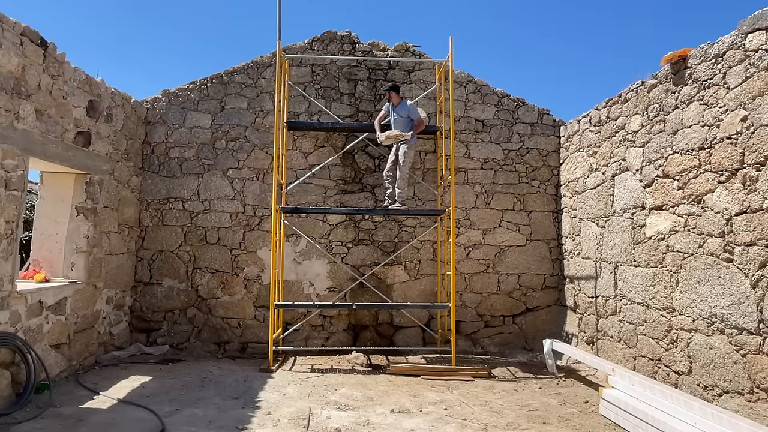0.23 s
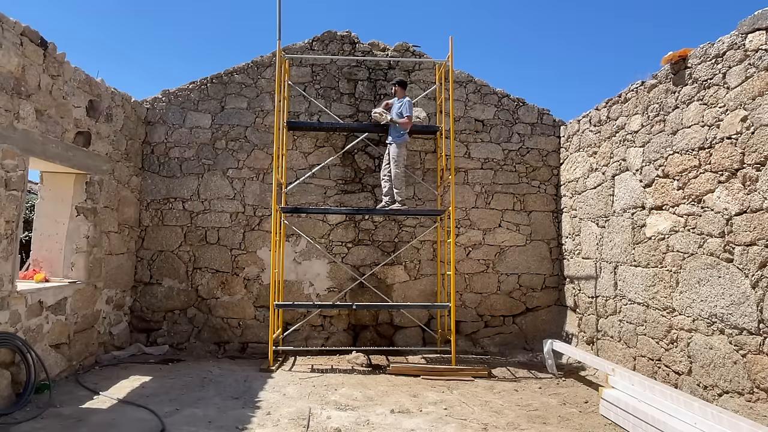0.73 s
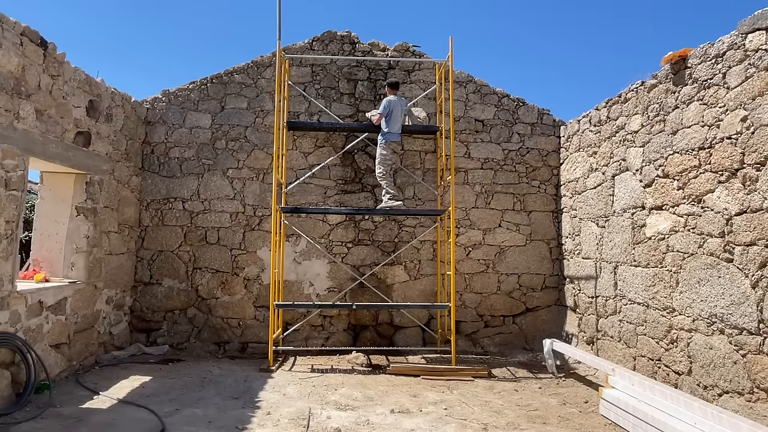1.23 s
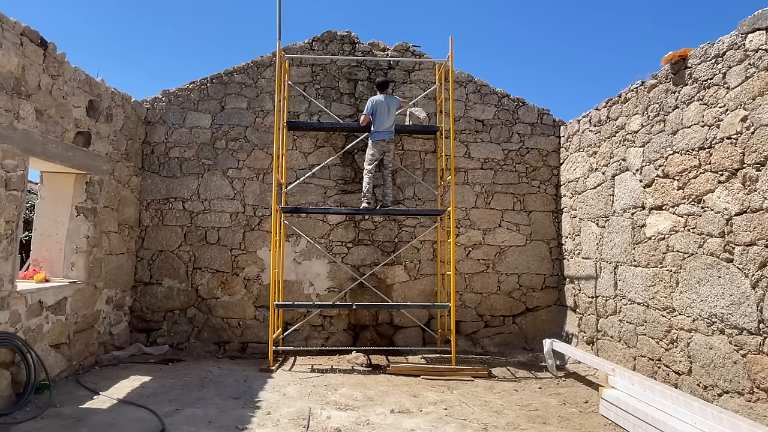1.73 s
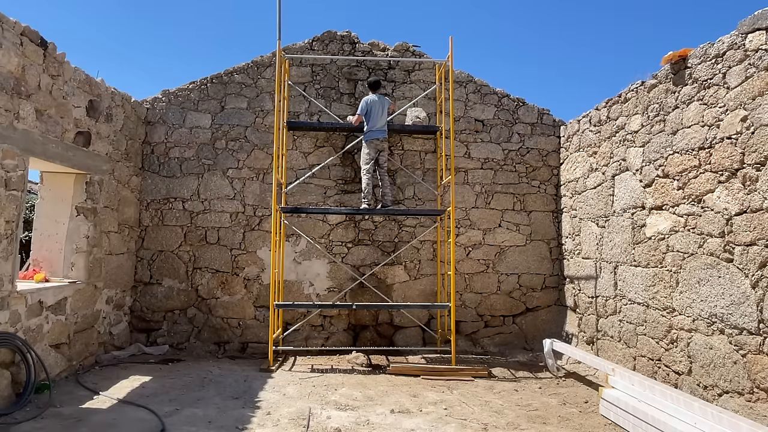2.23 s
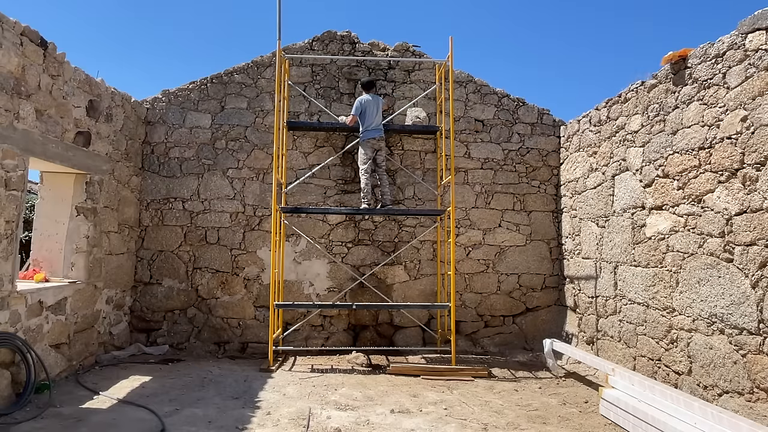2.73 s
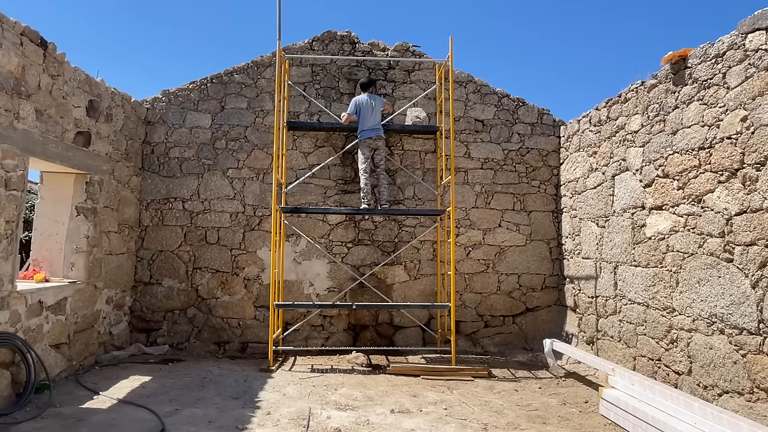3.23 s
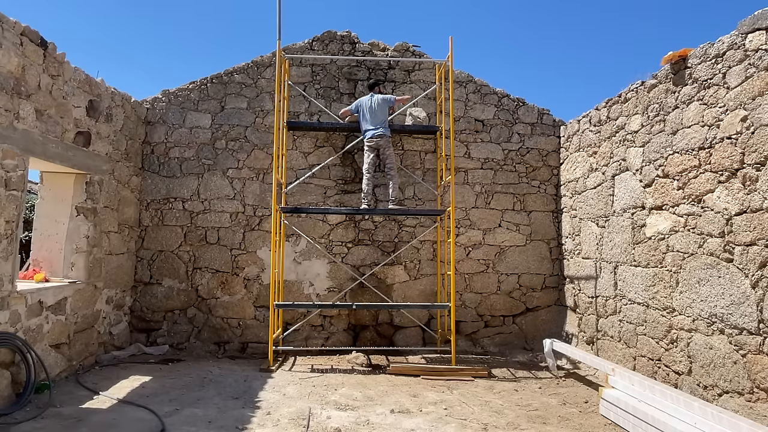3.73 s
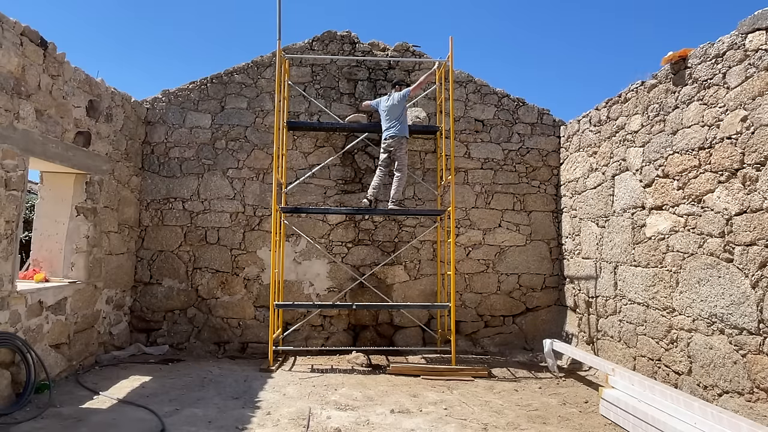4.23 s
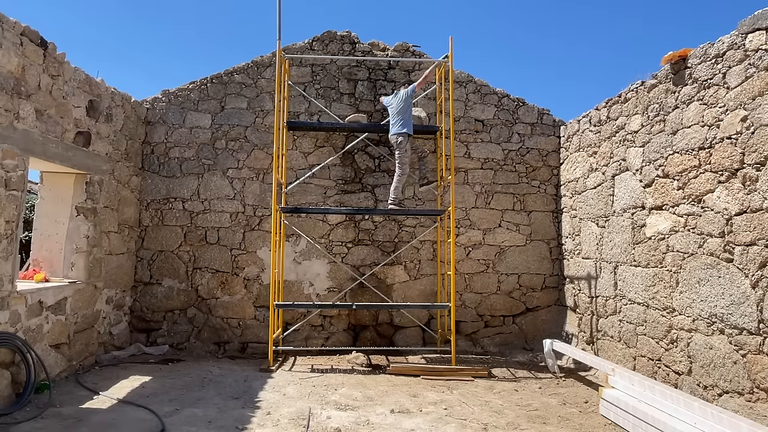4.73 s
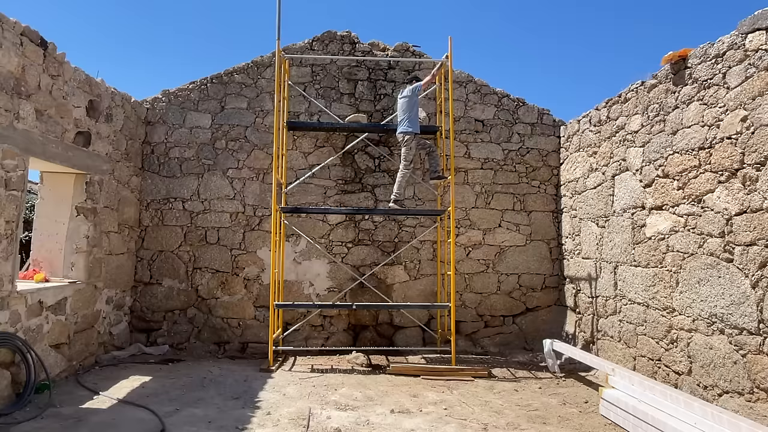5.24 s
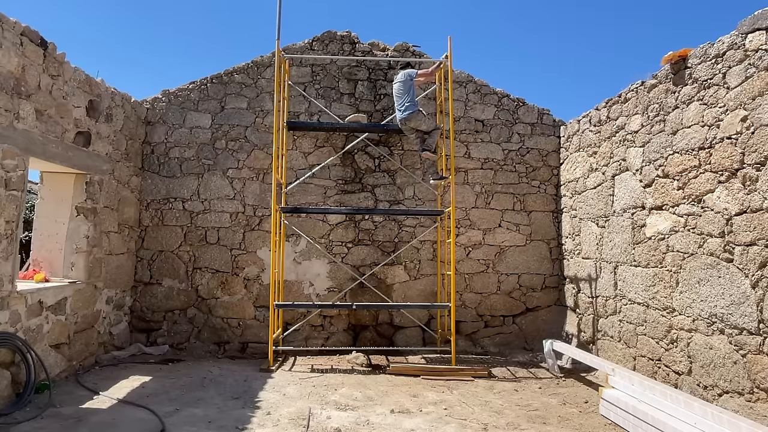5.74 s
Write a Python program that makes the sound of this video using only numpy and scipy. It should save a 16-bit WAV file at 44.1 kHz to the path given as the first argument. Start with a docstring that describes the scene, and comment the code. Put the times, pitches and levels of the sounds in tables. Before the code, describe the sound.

In a roofless stone shell, faint scuffs lead to a burst of heavy stone-on-board knocks and gritty dragging, then sparse footsteps and scrapes.

```python
"""Soft scrapes and scattered knocks come first, then heavy clacks and a gritty drag, with low gusts and faint hiss.
A heavy stone is carried along a scaffold inside a roofless stone house, set down on the upper deck and dragged.
Knocks are bursts of random grit clicks that ring the struck piece, the deck boards and the steel frame.
Stone and soles slide as filtered grain noise; fading noise gives the bare walls' echo.
Wind is a wobbling low tone with slow noise at two microphone ports; open air is shaped noise.
"""
import sys
import numpy as np
from scipy import signal
from scipy.fft import rfft, irfft
from scipy.io import wavfile
from scipy.ndimage import uniform_filter1d

SR = 44100
rng = np.random.default_rng(int(sys.argv[2]) if len(sys.argv) > 2 else 0)


def to_wav(sig):
    """Store sig (one row per channel, or 1-D mono) as 16-bit WAV at the path in sys.argv[1].

    Samples outside -1..1 are clipped; the rate is SR.
    """
    pcm = np.clip(np.atleast_2d(sig), -1, 1) * 32767
    pcm = np.round(pcm).astype(np.int16)
    wavfile.write(sys.argv[1], SR, pcm.T)  # frames by channels


N = 264600

# All table levels are settings that go in before the later gains, filters and echo.
# Blows: time_s (late in the build-up), strength_db, pitch_hz, deck_db, frame_db, grit_db
# (these three relative to the strength), contact_s (time constant of the fade)
BLOWS = [(0.391, -36.5, 2230, -23, -2, -16, 0.0054), (0.41, -50.5, 2140, -30, 12, 4, 0.003),
         (.428, -50, 2490, -28, 0, -16, 0.012), (0.52, -52.5, 1230, -10.5, -15, 2, 0.024),
         (0.551, -58, 6160, -2.5, 15.5, 1, 0.028), (0.854, -45.5, 846, -13, -18, -13, 0.023),
         (1.14, -54, 2210, -8, 11, -3, 0.013), (1.661, -44.5, 613, -15, 11.5, 0, 0.057),
         (1.694, -41, 2130, -9, 17, 5, 0.0093), (1.87, -57, 1480, -16.5, 3.5, -31, 0.029),
         (1.939, -49, 1760, -5, 12, -12.5, 0.018), (2.148, -23.5, 1100, -8, 3.5, -16.5, 0.013),
         (2.206, -20.5, 1370, -10.5, 5.5, -5, 0.0075), (2.223, -17, 864, -11.5, 4, -41, 0.005),
         (2.262, -26, 740, -17, -16, -40, 0.026), (2.392, -32, 1380, 2, -29, -2, 0.011),
         (2.424, -26, 980, -8, -25, -17, 0.0037), (2.497, -30, 1140, 0.5, -17, -28, 0.007),
         (2.558, -19.5, 1140, 1.5, -7.5, 2.5, 0.0088), (2.604, -24.5, 1140, 0, -8, 3.5, 0.0088),
         (2.629, -24.5, 1162, 1.5, -14, -4, 0.0063), (2.65, -17.5, 340, -24, -24, -20, 0.013),
         (2.68, -28.5, 730, -13, -20, -13, 0.013), (2.706, -25.5, 1090, -17.5, -13, -8, 0.0036),
         (2.815, -39.5, 2260, -9, 11, -17, 0.0099), (2.896, -34, 2044, -5.5, -5, 3.5, 0.018),
         (3.594, -45, 1300, -12, 7, -27, 0.029), (3.596, -49.5, 7270, -34, -4, -13, 0.024),
         (3.893, -60.5, 2036, -5.5, 8, -14, 0.02), (3.905, -44, 328, -33.5, -24, -19, 0.018),
         (3.979, -52.5, 5670, -27, -2, -1, 0.00082), (4.004, -54, 2200, -33, 5, 0.5, 0.014),
         (4.198, -33, 1470, -28.5, 5.5, -17.5, 0.024), (4.951, -43, 3040, -22, -5, -8, 0.00093),
         (4.958, -44, 2360, -7, 7, -6.5, 0.015), (5.109, -39, 630, -10, -20, -42, 0.0031),
         (5.194, -38.5, 1080, -4, -24, -42, 0.017), (5.232, -52.5, 1122, 8, -21, -34, 0.03),
         (5.443, -38.5, 2040, -4.5, 6, -8, 0.024), (5.447, -31.5, 458, -6.5, -8, -18.5, 0.025),
         (5.722, -37.5, 923, -4.5, -8, -33, 0.0029), (5.874, -25.5, 302, -11.5, -35, -38, 0.0061)]
# Slides over grit: start_s, length_s, grit_db, grit_pitch_hz, deck_rumble_db, sand_db, swell_db (over the slide)
SLIDES = [(0, 0.064, -68.5, 2240, -71, -86, -4), (0.09, 0.12, -69, 3900, -87, -74.5, 9),
          (0.229, 0.11, -71.5, 2640, -76.5, -73.5, 6), (0.794, 0.02, -73.5, 2600, -93, -73, -7),
          (0.847, 0.13, -71, 2530, -80.5, -76, 4.5), (1.11, 0.11, -62.5, 3060, -68.5, -70, 6),
          (1.282, 0.094, -71.5, 2400, -71, -77, -10), (1.52, 0.087, -72.5, 2390, -91, -86, -8.5),
          (1.704, 0.033, -67, 2380, -50, -48.5, -4.5), (2.187, 0.12, -64, 1351, -31, -51.5, -11.5),
          (2.416, 0.21, -57, 1950, -38, -59.5, 1), (2.619, 0.12, -69, 1700, -39.5, -55, -1),
          (2.835, 0.17, -44.5, 2300, -44, -49.5, -1), (3.12, 0.02, -64, 2380, -49, -54.5, -14),
          (3.163, 0.065, -56.5, 2300, -57, -65.5, 1), (4.084, 0.079, -67, 2400, -68.5, -73.5, 7),
          (4.528, 0.0177, -73, 2570, -75, -84.5, -7.5), (4.641, 0.056, -65.5, 3040, -62.5, -71, -1),
          (4.78, 0.078, -64.5, 3864, -73, -69.5, -1), (4.984, 0.059, -61.5, 2870, -56.5, -59.5, 0),
          (5.297, 0.17, -54.5, 3900, -55.5, -60, -1), (5.483, 0.18, -79, 3500, -46, -79, -13.5),
          (5.685, 0.12, -59, 2970, -54, -62.5, -6), (5.829, 0.18, -56.5, 3060, -54.5, -56.5, 0.5)]
# Rumble and sand between slides, as weight shifts: rumble_db, sand_db
IDLE_DB = [-82.5, -85.5]
# While the stone drags, the upper deck rings; soles only thud on the lower one: start_s, end_s
STONE_TIME = (2.1, 3.45)
# Ringing modes of the deck boards: pitch_hz, width_hz, level_db
DECK_MODES = [(313.1, 32, 12), (454, 25, -4.5), (551, 23, 2.5), (720.7, 13, 1), (991, 36, 5.5),
              (1129, 27, 2), (1383, 25, -7.5), (1590, 55, -5.5), (1684, 34, -7.5), (1890, 19, -11)]
# Ringing modes of the steel tubes: pitch_hz, width_hz, level_db
FRAME_MODES = [(885, 80, -2), (1395, 70, 0), (2092, 70, 2), (2590, 110, -2)]
# Echo of the walls: pitch_hz, t60_s (time to fall 60 dB), likeness of the two ports (0 to 1)
WALLS = [(80.36, 0.75, 1), (271.7, 0.46, 0.6), (590, 0.42, 0), (1444, 0.25, 0), (4246, 0.15, 0),
         (10000, 0.072, 0)]
# Gusts: start_s, length_s, level_db, centre_hz
GUSTS = [(0.859, 0.11, -71, 111.8), (1.761, 0.062, -61, 67.6), (2.243, 0.2, -44, 79.3),
         (2.551, 0.1, -41, 71.62), (2.673, 0.12, -52.5, 99.85), (2.879, 0.31, -59, 119.2),
         (3.393, 0.092, -50, 64.43), (3.597, 0.038, -57, 71.6), (3.643, 0.033, -49, 64.4),
         (3.798, 0.016, -39, 95.06), (3.913, 0.027, -52, 64.6), (4.003, 0.012, -43, 62.7),
         (4.085, 0.1, -53.5, 67.2), (4.561, 0.25, -69.5, 72.5), (4.965, 0.34, -64, 107.6),
         (5.225, 0.11, -56, 132.4), (5.457, 0.2, -51, 134.5), (5.728, 0.23, -62.5, 131.7)]
# Shape of the open-air hiss: pitch_hz, level_db (relative)
AIR_SHAPE = [(59, -2), (100, 4), (570, 1.5), (674, -17), (780, -5.5), (6620, -16), (11000, -45.5),
             (15000, -49.5)]

BUILD_S = 0.009  # longest build-up of a contact, while its grit crushes
# Speed into and out of a slide, in dB per second; sand settles first
SLIDE_START_DB_S, SLIDE_STOP_DB_S, SAND_STOP_DB_S = 421, 215, 334
ECHO_DB, ECHO_RISE_S = 0.5, 0.0013
GUST_RISE_DB_S, GUST_FALL_DB_S = 599, 249  # dB per second up and down
CALM_DB = -79  # wind setting between gusts
AIR_DB = -70.5
MIC_SOFT_HZ, MIC_EDGE_HZ, TOP_HZ = 12400, 13100, 15900
PORT_LAG = 2  # samples by which the right port hears later


def knocks():
    """Each blow is a short crumbling contact that clacks the piece, spits grit, jolts the frame and raps the deck."""
    t = np.arange(SR // 4) / SR
    clack = np.zeros(N + len(t))
    parts = np.zeros((3, N + len(t)))
    for time, strength_db, hz, *parts_db, contact in BLOWS:
        rise = min(BUILD_S, 3 * contact)
        shape = np.where(t < rise, (t / rise) ** 0.55, np.exp((rise - t) / contact))
        force = grains(8000, 2.9, size=len(t)) * shape
        # the random clicks are scaled to the same energy as the smooth shape
        force *= undb(strength_db) * np.sqrt(np.sum(shape ** 2) / np.sum(force ** 2))
        start = int((time - 0.72 * rise) * SR)
        at = slice(start, start + len(t))
        # stone hardly rings: one broad resonance, applied twice
        body = ring(ring(force, hz, hz / 2.6), hz, hz / 2.6)
        low_hz, high_hz = max(0.53 * hz, hz - 1400), min(1.55 * hz, hz + 1600)
        clack[at] += undb(3.5) * body + undb(-2.0) * band(force, low_hz, high_hz)
        parts[:, at] += undb(parts_db)[:, None] * force
    push, jolt, grit = parts[:, :N]
    stone = stone_drags()
    sole_thud = undb(10.5) * band(push * ~stone, 180, 1300)
    # too brief to move the deck's lowest mode much
    rap = undb(31.0) * deck(band(push * stone, 580, 4800, order=1))
    spit = band(grit, 1300, 12000)
    return clack[:N] + sole_thud + undb(-2.5) * frame(jolt) + spit + rap


def drag():
    """Stone and soles slide over grit: coarse grains chatter at each slide's pitch, sand hisses, boards rumble."""
    chatter = grains(3000, 2.7) * judder(35, 2.5)
    coarse = 0
    rumble_gain, sand_gain = undb(IDLE_DB)
    for start, length, grit_db, hz, rumble_db, sand_db, swell_db in SLIDES:
        gain = stroke(start, length, SLIDE_START_DB_S, SLIDE_STOP_DB_S, swell_db)
        settling = stroke(start, length, SLIDE_START_DB_S, SAND_STOP_DB_S, swell_db)
        colour = band(chatter, 0.42 * hz, 1.4 * hz) + undb(4.0) * ring(chatter, hz, hz / 4)
        coarse = coarse + undb(grit_db) * gain * unit(colour)
        rumble_gain = rumble_gain + undb(rumble_db) * gain
        sand_gain = sand_gain + undb(sand_db) * settling
    # the load rattles on the boards in lumps
    rattle = grains(1000, 2.5) * judder(30, 2.5)
    upper_deck = unit(deck(rattle))
    lower_deck = unit(band(rattle, 152, 1100))
    boards = np.where(stone_drags(), upper_deck, lower_deck)
    hiss = unit(band(grains(3500, 3.5), 5600, 11000))
    return coarse + undb(-3.5) * frame(coarse) + rumble_gain * boards + sand_gain * hiss


def stone_drags():
    """True for each sample at which the stone, rather than the soles, works the deck."""
    t = np.arange(N) / SR
    return (t > STONE_TIME[0]) & (t < STONE_TIME[1])


def deck(force):
    """The boards answer a force with their modes over a broad wooden thud."""
    modes = 0
    for hz, width, db in DECK_MODES:
        # as the load shifts, other modes come forward
        shifting = force * judder(18, 5.0)
        modes = modes + undb(db) * ring(shifting, hz, width) / np.sqrt(width)
    return modes + undb(-30) * band(force, 240, 970)


def frame(force):
    """The steel tubes of the scaffold ring briefly when jolted."""
    return sum(undb(db) * ring(force, hz, width) for hz, width, db in FRAME_MODES)


def grains(rate, spread_db, size=N):
    """Grit breaking: random clicks, on average `rate` per second, some larger than the rest."""
    hit = rng.random(size) < rate / SR
    extra_db = spread_db * np.minimum(rng.exponential(size=size), 3.5)
    return unit(hit * rng.standard_normal(size) * undb(extra_db) + 1e-9)


def judder(rate, db):
    """Stick and slip: the grip changes in uneven, slightly smoothed steps, `rate` per second."""
    step = int(SR / rate)
    levels = np.repeat(rng.standard_normal(N // step + 1), step)
    return undb(db * uniform_filter1d(levels, step // 2)[:N])


def stroke(start, length, rise_db_s, fall_db_s, swell_db=0):
    """Gain of one slide or gust: climbs to its start, swells while it lasts, then dies away."""
    t = np.arange(0, N, 16) / SR - start  # one value for every 16 samples
    held = swell_db * np.clip(t / length, 0, 1)
    db = held + rise_db_s * np.minimum(t, 0) - fall_db_s * np.maximum(t - length, 0)
    return np.repeat(undb(db), 16)[:N]


def walls(x, count=40):
    """The work shifts about, so the echo pattern drifts: overlapping pieces each get their own echo."""
    place = np.arange(N) / N * (count - 1)
    out = np.zeros((2, N))
    for k in range(count):
        near = np.flatnonzero(abs(place - k) < 1)
        first = near[0]
        piece = x[near] * np.cos(np.pi / 2 * (place[near] - k))
        heard = signal.fftconvolve(piece[None], echo(), axes=1)
        out[:, first:first + heard.shape[1]] += heard[:, :N - first]
    return out


def echo():
    """Direct sound, then a quick swell of echoes from stone on all sides; the open roof drains it fast."""
    t = np.arange(SR // 3) / SR
    hz, t60, likeness = np.transpose(WALLS)
    likeness = np.clip(likeness, 0, 0.99)
    out = 0
    for centre in 40 * 2.0 ** np.arange(0.5, 9):  # octave bands
        decay = np.interp(np.log(centre), np.log(hz), t60)
        alike = np.interp(np.log(centre), np.log(hz), likeness)
        noise = rng.standard_normal((2, len(t)))
        mid, side = band(noise, centre / 2 ** 0.5, centre * 2 ** 0.5)
        fall = np.exp(-np.log(1000) * t / decay) * (1 - np.exp(-t / ECHO_RISE_S))
        fall /= np.sqrt(np.sum(fall ** 2))
        shared = np.sqrt((1 + alike) / 2) * mid
        opposed = np.sqrt((1 - alike) / 2) * side * np.array([[1], [-1]])
        out = out + fall * (shared + opposed)
    out = undb(ECHO_DB) * out
    out[:, 0] += undb([-3.0, -3.5])  # direct sound, left and right
    return out


def wind():
    """Gusts and the swaying frame rumble: a wobbling tone whose centre wanders, partly alike at the ports."""
    starts, _, _, centres = np.transpose(GUSTS)
    gain = undb(CALM_DB)
    for start, length, db, _ in GUSTS:
        gain = gain + undb(db) * stroke(start, length, GUST_RISE_DB_S, GUST_FALL_DB_S)
    t = np.arange(N) / SR
    turn = np.exp(2j * np.pi * np.cumsum(np.interp(t, starts, centres)) / SR)
    # slow noise makes the tone wobble in level and phase
    slow_filter = signal.butter(3, 22.0, fs=SR, output="sos")
    slow = signal.sosfilt(slow_filter, rng.standard_normal((6, N)))
    left, right, both = ((slow[:3] + 1j * slow[3:]) * turn).real
    wobble = unit(np.array([left, right]) + 0.52 * both)
    eddies = unit(band(rng.standard_normal((2, N)), 43, 77))  # slow eddies at each port
    return gain * (wobble + undb(-2.5) * eddies)


def air():
    """Faint outdoor hiss: noise shaped by pitch, alike left and right only in the bass."""
    f = np.maximum(np.arange(N // 2 + 1) * SR / N, 1)
    hz, db = np.transpose(AIR_SHAPE)
    shape = undb(np.interp(np.log(f), np.log(hz), db))
    mid, side = rfft(rng.standard_normal((2, N))) * shape
    side = side * np.minimum(f / 700, 1)
    return undb(AIR_DB) * unit(irfft(np.array([mid + side, mid - side]), N))


def undb(db):
    """Turn decibels into a gain."""
    return 10 ** (np.asarray(db) / 20)


def unit(x):
    """Scale to an rms (average strength) of 1."""
    return x / np.sqrt(np.mean(x ** 2))


def band(x, lo_hz, hi_hz, order=2):
    """Keep the sound between two pitches with a smooth band-pass filter."""
    return signal.sosfilt(signal.butter(order, [lo_hz, hi_hz], "band", fs=SR, output="sos"), x)


def ring(x, hz, width_hz):
    """One resonance with gain 1 at its centre; a narrower width rings longer."""
    return signal.lfilter(*signal.iirpeak(hz, hz / width_hz, fs=SR), x)


def scene():
    """Work on the scaffold heard through the walls' echo, with wind and open air."""
    return walls(knocks() + drag()) + wind() + air()


def record(dry):
    """Two ports, the right one slightly late; the microphone dulls the top and the recorder cuts it off."""
    ports = np.array([dry[0], np.roll(dry[1], PORT_LAG)])
    soft = signal.sosfilt(signal.butter(3, MIC_SOFT_HZ, fs=SR, output="sos"), ports)
    edged = signal.sosfilt(signal.cheby1(8, 0.5, MIC_EDGE_HZ, fs=SR, output="sos"), soft)
    return signal.sosfilt(signal.ellip(10, 0.2, 80, TOP_HZ, fs=SR, output="sos"), edged)


dry = scene()
out = record(dry)
to_wav(out)
```